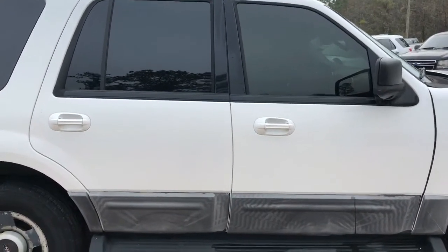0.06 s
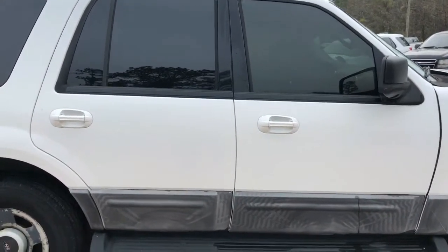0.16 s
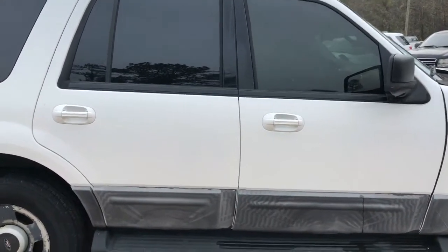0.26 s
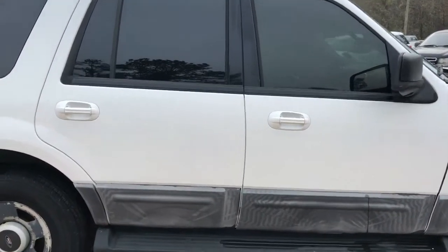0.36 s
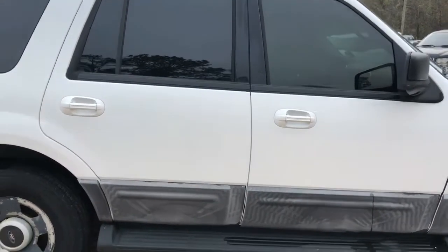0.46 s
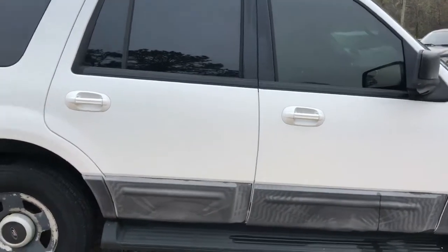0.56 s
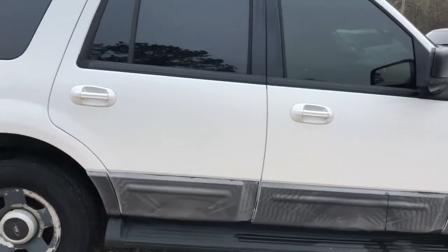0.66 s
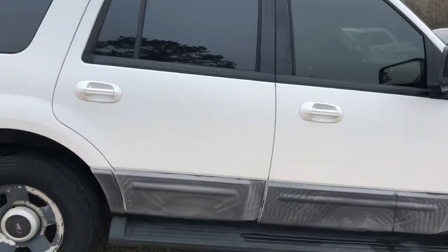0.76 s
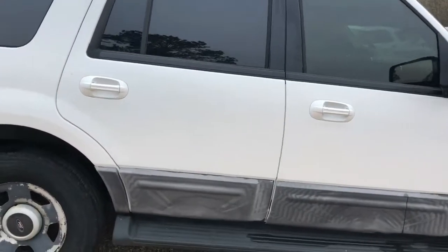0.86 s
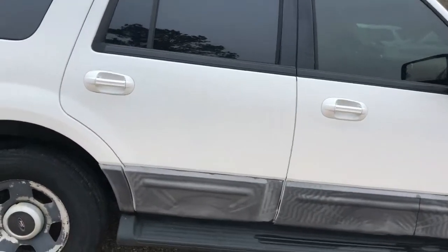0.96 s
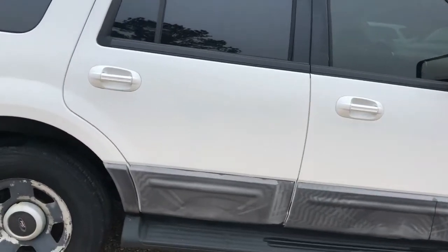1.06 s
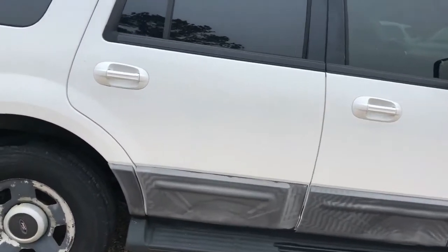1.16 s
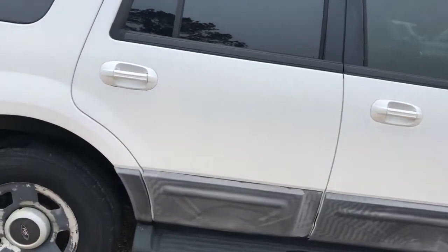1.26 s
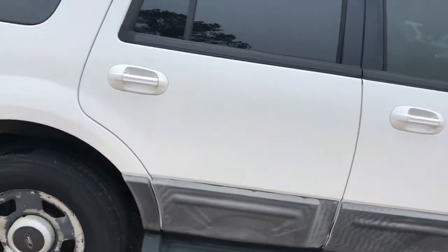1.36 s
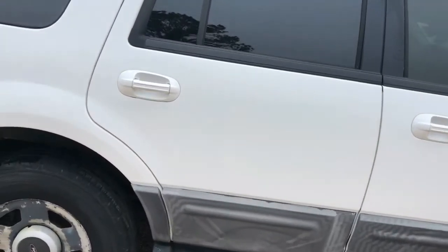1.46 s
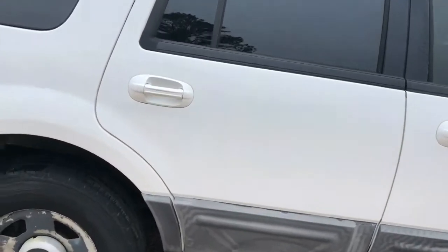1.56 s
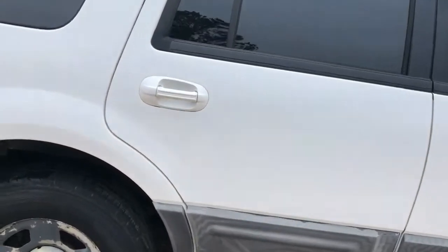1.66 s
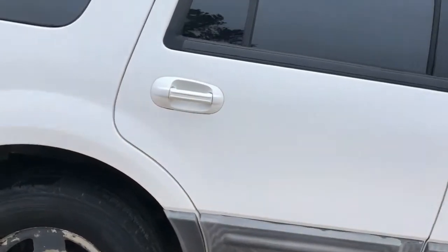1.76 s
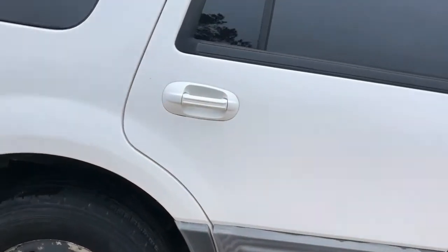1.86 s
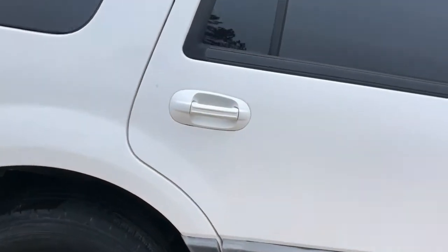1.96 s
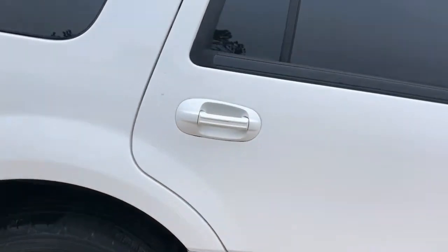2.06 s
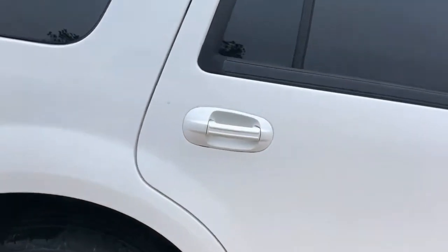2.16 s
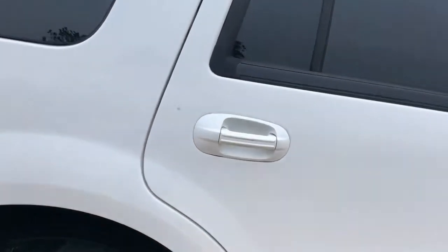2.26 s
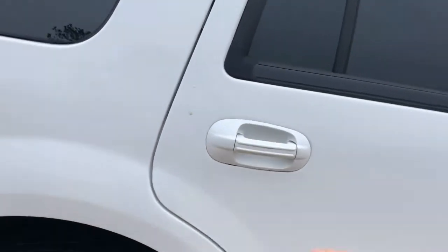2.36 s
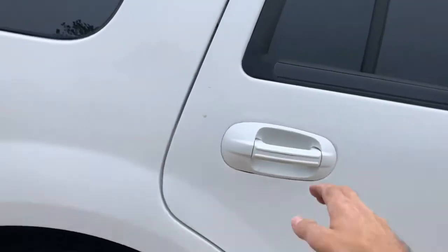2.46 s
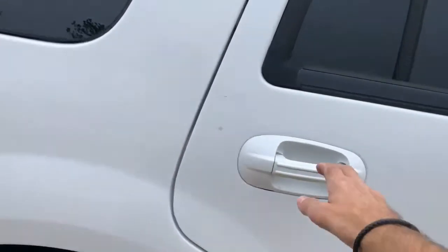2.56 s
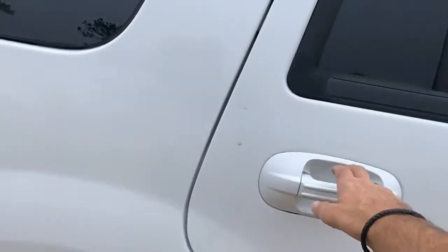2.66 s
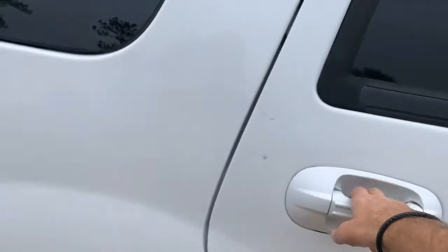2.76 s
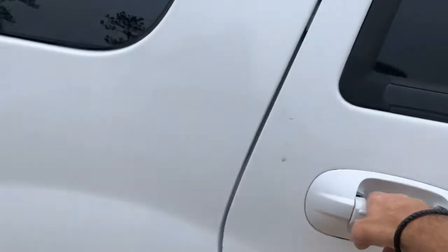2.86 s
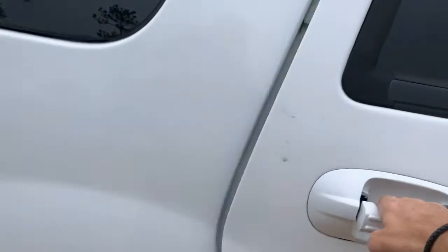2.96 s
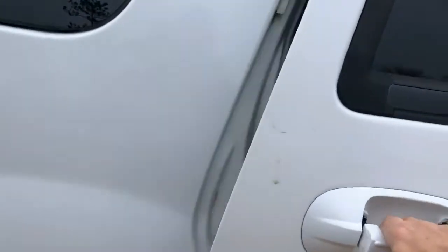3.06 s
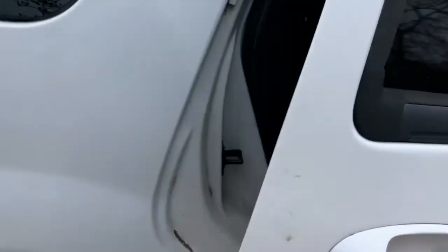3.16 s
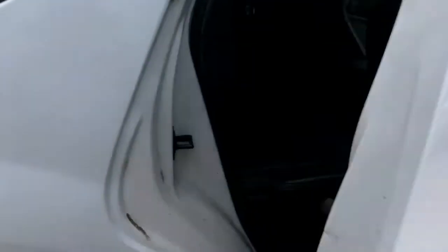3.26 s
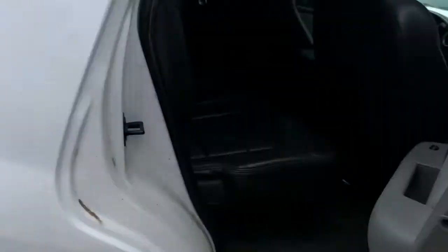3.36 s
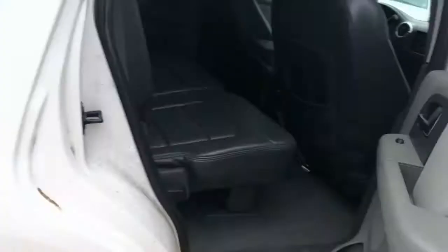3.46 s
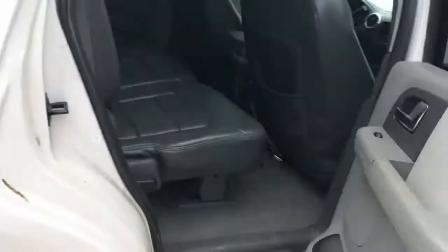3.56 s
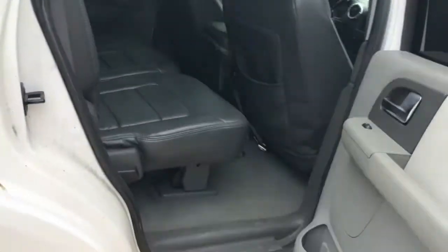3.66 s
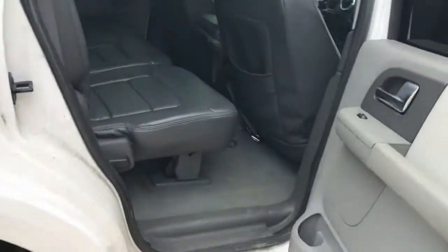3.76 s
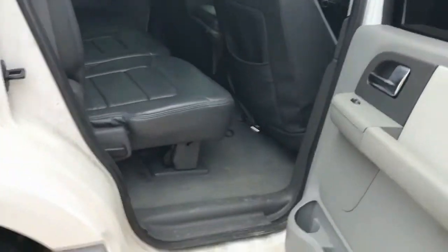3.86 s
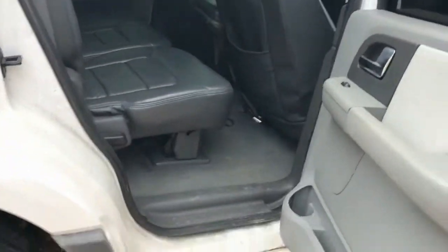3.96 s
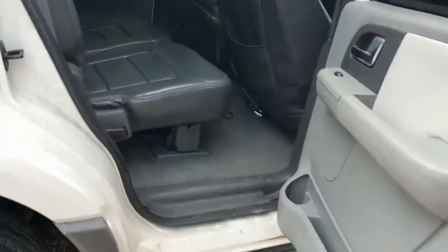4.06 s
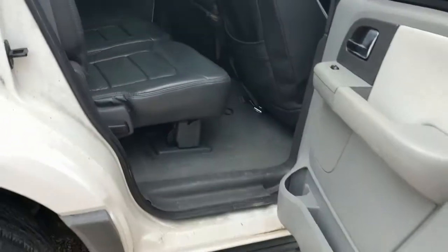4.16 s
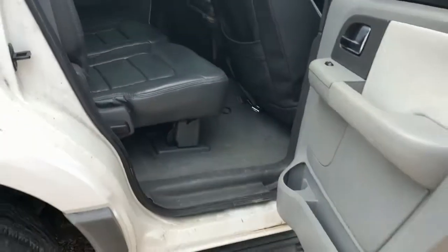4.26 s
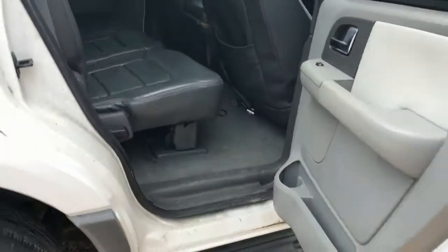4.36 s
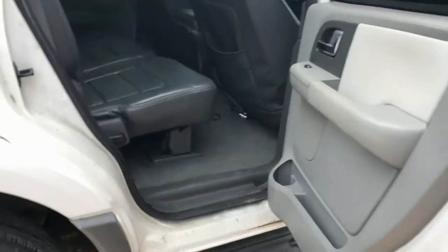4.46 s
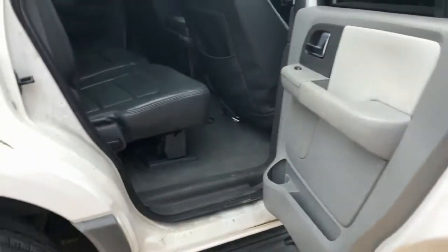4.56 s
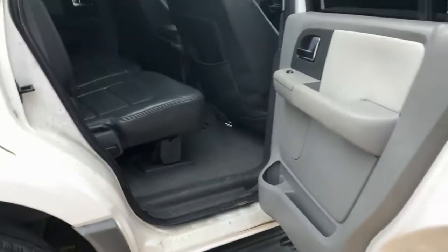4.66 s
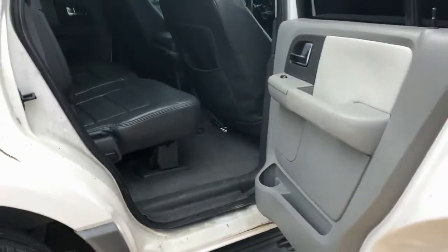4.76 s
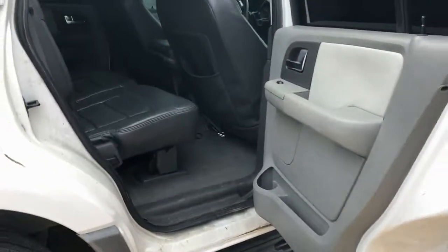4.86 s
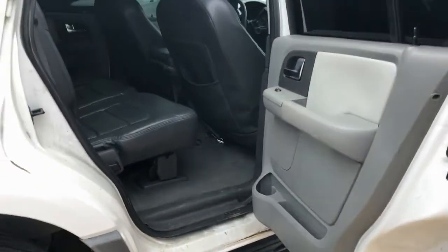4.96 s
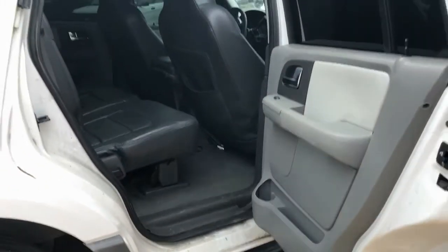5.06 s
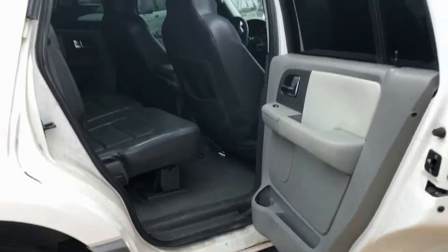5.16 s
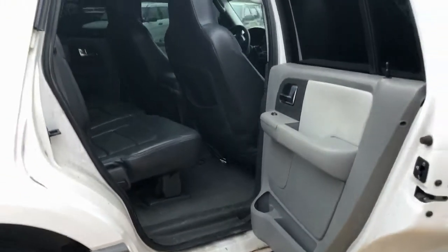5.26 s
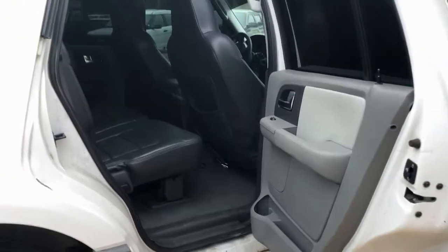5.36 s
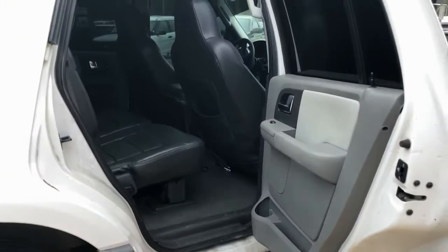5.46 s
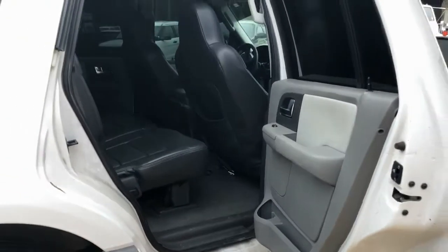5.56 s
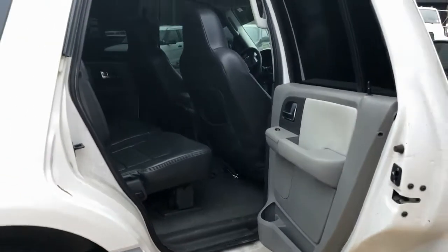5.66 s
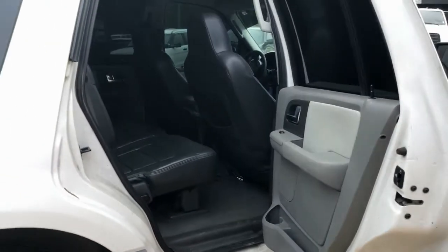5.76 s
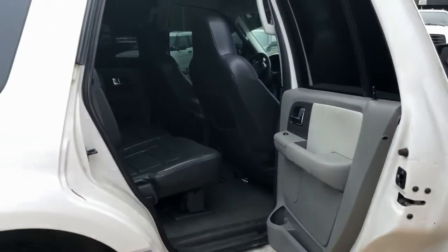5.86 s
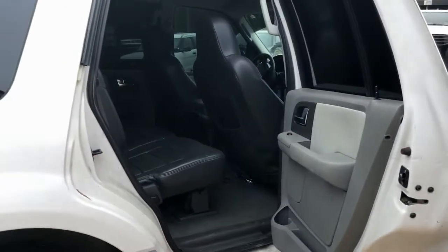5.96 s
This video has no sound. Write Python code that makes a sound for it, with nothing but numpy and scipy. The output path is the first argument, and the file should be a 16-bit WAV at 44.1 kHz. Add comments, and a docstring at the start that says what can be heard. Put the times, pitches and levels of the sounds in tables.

```python
"""Distant traffic hums throughout as someone walks over a gravel lot to a parked car: stones tick as they
collide, grit crunches under sliding shoes and heels thud. Near 2.9 s the rear door handle is pulled: the
seal starts to peel, and handle and latch parts snap and thump the door shell into its bending modes,
hardest near 3.4 s. The door swings open, shuddering, and from 4.1 s its hinge creaks by stick-slip
friction while the gravel goes on shifting underfoot."""
import sys
import numpy as np
from scipy import signal
from scipy.io import wavfile
from scipy.ndimage import uniform_filter1d

SR = 44100
rng = np.random.default_rng(int(sys.argv[2]) if len(sys.argv) > 2 else 0)


def store_pcm(level_fs):
    """Save levels as 16-bit WAV."""
    pcm = np.round(np.clip(level_fs, -1, 1) * 32767).astype(np.int16)
    wavfile.write(sys.argv[1], SR, np.atleast_2d(pcm).T)


N = 265041


def undb(db):
    """Decibels to amplitude ratio."""
    return 10 ** (np.asarray(db) / 20)


def level(x, db):
    """Scale to an RMS level."""
    return x * undb(db) / np.sqrt(np.mean(x ** 2))


def band(x, hz, width_hz):
    """Second-order resonance with gain 1 at its centre."""
    return signal.lfilter(*signal.iirpeak(min(hz, .45 * SR), hz / width_hz, fs=SR), x)


def fade(t60_s, size):
    """Exponential decay of a damped vibration: 60 dB in t60_s."""
    return np.exp(-np.log(1000) * np.arange(size) / SR / max(t60_s, .004))


def add(out, start_s, x):
    """Superpose x on out from start_s."""
    i = int(start_s * SR)
    out[i:i + len(x)] += x[:N - i]


def drift(rate_hz):
    """Slow random modulation: values held for 1 / rate_hz seconds and smoothed twice."""
    hold = int(SR / rate_hz)
    steps = np.repeat(rng.standard_normal(N // hold + 1), hold)
    return uniform_filter1d(uniform_filter1d(steps, hold), hold)[:N]


def grains(per_s, spread_db, t60_s):
    """Poisson process of sharp, decaying noise bursts, a few much bigger than the rest."""
    hits = rng.random(N) < per_s / SR
    strengths = hits * undb(spread_db * rng.exponential(size=N))
    envelope = signal.fftconvolve(strengths, fade(t60_s, 1024))[:N]
    return envelope * rng.standard_normal(N)


# Relative spectrum of distant traffic: frequency_hz, density_db
TRAFFIC_SPECTRUM = [(15, -40), (25, -6), (92, 1), (153, -6), (217, -2), (373, -11), (439, -8.5),
                    (516, -8.5), (695, -6), (1160, -13.5), (2110, -29.5), (5280, -36), (6380, -40.5),
                    (7110, -41), (16000, -48.5)]
def traffic():
    """Amplitude-modulated noise: third-octave bands swell together and flicker independently."""
    frequency_hz, density_db = np.transpose(TRAFFIC_SPECTRUM)
    out, swell_db = np.zeros(N), 0.4 * drift(0.485)
    for hz in 25 * 2 ** (np.arange(29) / 3):
        steady_db = np.interp(np.log(hz), np.log(frequency_hz), density_db)
        flicker_db = 3.2 * drift(23)
        noise = band(band(rng.standard_normal(N), hz, hz / 3), hz, hz / 3)
        out += undb(steady_db + swell_db + flicker_db) * noise
    return level(out, -57.5)


# Collisions of single stones and small parts; crack and edge are relative to the body's peak:
# start_s, peak_db, pitch_hz, crack_db, crack_hz, t60_s, edge_db
STONE_IMPACTS = [(0.175, -52, 1130, 0, 4540, 0.018, -12), (0.2434, -51, 902, -12, 5070, 0.018, -26),
                 (0.3292, -47, 937, -13, 3600, 0.018, -30), (0.3554, -55, 1510, -13, 3570, 0.018, -22),
                 (0.4226, -44, 1040, -4, 5200, 0.016, -21), (0.4379, -37.5, 1250, -21, 3030, 0.02, -33),
                 (0.4963, -44, 1120, -1, 5160, 0.018, -15), (0.5272, -32, 1360, -8, 4800, 0.018, -24),
                 (0.5606, -36.5, 1450, -23, 3280, 0.018, -33), (0.5721, -37.5, 1440, -27, 3280, 0.02, -32),
                 (0.6255, -38, 2840, 0, 3000, 0.018, -10), (0.6354, -36, 2480, -1, 3400, 0.018, -15),
                 (0.7931, -44, 1120, -16, 3540, 0.018, -26), (0.8414, -54, 930, 0, 5170, 0.018, -11),
                 (1.0156, -38, 930, -15, 3160, 0.018, -25), (1.061, -45.5, 953, -14, 5030, 0.018, -23),
                 (1.1144, -40, 1660, -4, 7420, 0.018, -14), (1.1209, -44, 1130, -9, 7280, 0.018, -13),
                 (1.1623, -34, 1260, 2.5, 5650, 0.018, -10), (1.1707, -39, 1170, -1, 5510, 0.018, -13),
                 (1.2264, -41, 1250, -11, 4810, 0.018, -21), (1.2424, -48, 1260, -14, 3140, 0.018, -27),
                 (1.4192, -33.5, 1370, -24, 3030, 0.022, -30), (1.6097, -47, 1150, -4, 3670, 0.02, -18),
                 (1.6477, -55, 929, -7, 3450, 0.018, -17), (1.6761, -43.5, 1540, -11, 3130, 0.02, -25),
                 (1.7504, -36, 4400, -3, 4760, 0.018, -9), (1.7554, -29, 1750, -2, 6090, 0.018, -8),
                 (1.7784, -35, 895, -10, 5200, 0.017, -15), (1.7888, -39.5, 1090, -17, 5150, 0.018, -24),
                 (1.8238, -31.5, 950, -8, 3060, 0.021, -12), (1.8437, -24.5, 835, -9, 2980, 0.021, -14),
                 (1.8504, -41, 1270, 13.5, 8920, 0.018, -5), (1.8984, -49.5, 1050, -5, 4890, 0.018, -9),
                 (1.9674, -49, 1480, -4, 3870, 0.018, -22), (2.3565, -42, 1240, -14, 3160, 0.018, -27),
                 (2.4019, -51, 1030, 6, 3400, 0.018, -14), (2.4174, -45, 1190, -2, 5420, 0.018, -18),
                 (2.4324, -36, 1250, -15, 3330, 0.02, -19), (2.4658, -38, 1250, -14, 7140, 0.018, -17),
                 (2.4917, -40, 1260, -12, 7280, 0.018, -15), (2.5082, -35, 1210, -21, 7330, 0.018, -26),
                 (2.5316, -34, 1100, -18, 3410, 0.018, -25), (2.5576, -33, 1130, -20, 3320, 0.018, -26),
                 (2.6259, -50, 1330, -15, 5000, 0.018, -25), (2.6564, -39, 1033, -22, 3140, 0.018, -32),
                 (2.7147, -45, 1280, -10, 3040, 0.018, -25), (2.7526, -36, 902, -26, 3360, 0.018, -36),
                 (2.7726, -37, 920, -24, 5120, 0.018, -29), (2.833, -38, 970, -22, 7240, 0.018, -29),
                 (3.0869, -33.5, 940, -16, 3520, 0.02, -20), (3.1148, -42, 1370, -13, 3500, 0.018, -19),
                 (3.1414, -46, 1460, -8, 3460, 0.018, -20), (3.2204, -49, 1100, -1, 3470, 0.018, -11),
                 (3.253, -38.5, 1170, -16, 3200, 0.022, -26), (3.2854, -41, 1140, -11, 5140, 0.018, -19),
                 (3.4254, -41, 996, -10, 3800, 0.018, -16), (3.5554, -43.5, 902, 8.5, 7170, 0.018, -3),
                 (3.6321, -32.5, 1270, -7, 5380, 0.021, -15), (3.6414, -45, 1310, 7, 3430, 0.016, -5),
                 (3.8706, -57, 1450, -16, 3550, 0.018, -25), (3.9838, -52, 1130, -9, 3010, 0.018, -22),
                 (4.0228, -43, 1140, -3, 3490, 0.018, -7), (4.0452, -38.5, 880, 10, 7560, 0.023, 2),
                 (4.0604, -42, 915, 4, 5390, 0.018, -9), (4.0816, -52.5, 1040, 14, 5640, 0.02, -4),
                 (4.1515, -45, 902, -11, 3310, 0.02, -20), (4.2184, -66, 1010, 1, 7320, 0.018, -4),
                 (4.4079, -46.5, 2130, -3, 6840, 0.021, -8), (4.4308, -57, 3000, 16, 4770, 0.018, -7),
                 (4.4964, -41.5, 3140, -5, 3000, 0.021, -16), (4.6663, -48, 2970, -11, 3550, 0.02, -24),
                 (4.8688, -38, 1490, -11, 3280, 0.018, -23), (4.8933, -46, 1480, -15, 4180, 0.018, -26),
                 (5.0384, -56, 1035, -7, 4870, 0.018, -25), (5.1976, -44, 1000, -10, 5580, 0.018, -19),
                 (5.2375, -39, 1570, -20, 3010, 0.018, -28), (5.3694, -58, 1034, -7, 3350, 0.018, -22),
                 (5.3994, -48.5, 1530, -14, 3080, 0.018, -31), (5.5383, -46, 1150, -11, 3000, 0.018, -23),
                 (5.6545, -46, 1190, -21, 5070, 0.018, -29)]
def stone_ticks():
    """Damped resonance: each struck stone rings briefly under a brighter crack; faint grit ticks on."""
    out, size = np.zeros(N), 2048
    for start_s, peak_db, pitch_hz, crack_db, crack_hz, t60_s, edge_db in STONE_IMPACTS:
        contact = rng.standard_normal(size)
        contact[:2] += 4  # the first contact is the hardest
        body = band(contact * fade(t60_s, size), pitch_hz, 0.44 * pitch_hz)
        body = band(body, pitch_hz, 1.9 * pitch_hz)
        crack = band(contact * fade(1.03 * t60_s, size), crack_hz, 1.5 * crack_hz)
        crack = band(crack, crack_hz, 2.6 * crack_hz)
        edge = band(band(contact * fade(.7 * t60_s, size), 11000, 7000), 11500, 9000)
        for part, relative_db in (body, 0), (crack, crack_db), (edge, edge_db):
            add(out, start_s, undb(peak_db + relative_db) * part / np.abs(part).max())
    grit = grains(per_s=40, spread_db=1.8, t60_s=0.014)
    return out + level(band(band(grit, 3700, 5100), 3500, 9000), -80.5)


# Gravel and grit sliding under a shoe or hand; treble and crunch are relative to the scuff's gain:
# start_s, length_s, rise_fraction, gain_db, hiss_hz, treble_db, crunch_db
SCUFFS = [(0.318, 0.044, 0.17, -71, 2700, -14, 14), (0.421, 0.14, 0.82, -60, 4600, -16, 2),
          (0.568, 0.045, 0.7, -79.5, 2200, -12, 24), (0.624, 0.067, 0, -72.5, 3100, -2, 17.5),
          (0.79, 0.088, 0.14, -73, 3800, -9, 1), (0.91, 0.077, 0.27, -73, 3500, -6, 10),
          (1.009, 0.098, 0.05, -65.5, 2830, -8, 5.5), (1.103, 0.11, 0.17, -60.5, 3700, 3.5, 10),
          (1.175, 0.13, 0.3, -64, 3000, -6, 11.5), (1.594, 0.3, 0.05, -68.5, 3100, -6, 0),
          (1.746, 0.028, 0.17, -45.5, 5100, 1.5, 4), (1.78, 0.088, 0, -57.5, 2700, -2.5, 10.5),
          (1.841, 0.098, 0.69, -57.5, 3830, -8, 1.5), (1.93, 0.085, 0.3, -65.5, 4000, -21, 0),
          (2.35, 0.028, 0.38, -60.5, 2900, -15, 4), (2.402, 0.054, 0, -55.5, 2920, -6.5, 5.5),
          (2.459, 0.058, 0.24, -63.5, 2900, 4.5, 16), (2.525, 0.058, 0.19, -62, 2930, -2, 10),
          (2.565, 0.41, 0.02, -75, 2700, -0.5, 9.5), (3.082, 0.11, 0.08, -61.5, 2900, -5, 2),
          (3.19, 0.11, 0.28, -70.5, 3100, -3, 6), (3.283, 0.16, 0.25, -59, 3220, -6, 6.5),
          (3.4, 0.17, 0.12, -60.5, 2500, -11, 7.5), (3.534, 0.21, 0.33, -65.5, 2900, -4.5, 3.5),
          (3.747, 0.16, 0.05, -67, 3680, 2, 9.5), (3.841, 0.15, 0.57, -62, 3200, -11, 3),
          (3.979, 0.097, 0, -60, 3350, -15, 3.5), (4.048, 0.021, 0.4, -60, 6900, -1, 3),
          (4.074, 0.035, 0.5, -68, 5200, -2, -15), (4.162, 0.036, 0.2, -61, 3660, -12, -23),
          (4.415, 0.06, 0.17, -60, 5430, 1, -6), (4.464, 0.06, 0.43, -58.5, 4000, -2.5, -3),
          (4.523, 0.14, 0.31, -64.5, 3340, -8, 3), (4.66, 0.046, 0.3, -69.5, 3200, -10, 8),
          (4.701, 0.055, 0.6, -57, 3600, -4, 3.5), (4.765, 0.075, 0, -71.5, 4100, -6, 7.5),
          (4.854, 0.049, 0.24, -61.5, 3000, -8.5, 6), (4.992, 0.07, 0.64, -70, 4300, -18, 4),
          (5.148, 0.074, 0.61, -55.5, 4700, -9, 6.5), (5.209, 0.092, 0.18, -70, 2300, -4, 12),
          (5.349, 0.083, 0.05, -70, 3126, -18, 9.5), (5.474, 0.11, 0.47, -71.5, 2900, -11, 9.5),
          (5.643, 0.03, 0.43, -76, 2400, -13, -4.5)]
def gravel_scuffs():
    """Granular friction: many tiny impacts merge, fine grit into a hiss, coarse stones into a crunch."""
    fine = level(grains(per_s=1800, spread_db=1.1, t60_s=0.013), 0)
    coarse = grains(per_s=500, spread_db=2.0, t60_s=.012)
    treble = level(band(band(fine, 7300, 8000), 6700, 15700), 0)
    crunch = level(band(band(coarse, 670, 1540), 810, 1440), 0)
    out = np.zeros(N)
    for start_s, length_s, rise, gain_db, hiss_hz, treble_db, crunch_db in SCUFFS:
        progress = np.arange(int(1.5 * length_s * SR)) / SR / length_s
        rise = np.clip(rise, .02, .95)
        release = np.exp(-1.5 * ((progress - rise) / (1 - rise)) ** 2)
        envelope = np.where(progress < rise, progress / rise, release)
        first = int(start_s * SR)
        span = slice(first, first + len(progress))
        hiss = undb(4.5) * band(band(fine[span], hiss_hz, .8 * hiss_hz), hiss_hz, 2.7 * hiss_hz)
        scuff = hiss + undb(treble_db) * treble[span] + undb(crunch_db) * crunch[span]
        add(out, start_s, undb(gain_db + 2.0) * envelope * scuff)
    return out


# Heels on the ground and the door's weight on its hinge: start_s, peak_db, pitch_hz, t60_s
THUDS = [(0.5, -45.5, 65, 0.11), (1.434, -39.5, 162, 0.19), (1.449, -35.5, 80, 0.2),
         (1.47, -47, 94.2, 0.15), (1.847, -39, 234, 0.086), (2.05, -49.5, 129, 0.11),
         (2.48, -44, 187, 0.24), (3.499, -32.5, 159, 0.12), (4.088, -51, 59.2, 0.13),
         (4.439, -44.5, 84, 0.12)]
def thuds():
    """Transient response: a noise burst drives a low resonance, which swells over milliseconds and dies."""
    out, size = np.zeros(N), 8192
    for start_s, peak_db, pitch_hz, t60_s in THUDS:
        burst = rng.standard_normal(size) * fade(t60_s, size)
        thud = band(band(burst, pitch_hz, 0.41 * pitch_hz), pitch_hz, 2.1 * pitch_hz)
        add(out, start_s, undb(peak_db) * thud / np.abs(thud).max())
    return out


# Bending modes of the door shell: pitch_hz, gain_db, t60_s
SHELL_MODES = [(74, -10, 0.34), (124, -2, 0.13), (173, -6.5, 0.18), (266.4, -13.5, 0.14),
               (347.3, -1, 0.088), (425.2, 2.5, 0.084), (513, 0.5, 0.058), (651, 2.5, 0.044),
               (706, -0.5, 0.082), (868, 0, 0.034), (1008, -1.5, 0.043), (1098, 1.5, 0.027),
               (1205, 3.5, 0.028), (1343, 2, 0.036), (1475, -7.5, 0.061), (1610, -11.5, 0.11),
               (1604, -9, 0.057), (2360, -9, .06), (2480, -28, 0.094), (3030, -11, .05)]
RING_SAMPLES = SR // 3
def shell_ring(mode_gains, lag_ms):
    """Dispersion: bending waves are slow in the bass, so low modes arrive late (by lag_ms at 120 Hz)."""
    out, t = np.zeros(RING_SAMPLES), np.arange(RING_SAMPLES) / SR
    for gain, (pitch_hz, gain_db, t60_s) in zip(mode_gains, SHELL_MODES):
        lag_s = lag_ms / 1000 * (120 / pitch_hz) ** 1.5
        arrival = np.sin(np.pi / 2 * np.clip(t / (1.3 * lag_s), 0, 1)) ** 3
        mode = np.sin(2 * np.pi * pitch_hz * (t - lag_s))
        out += gain * undb(gain_db) * mode * arrival * fade(t60_s, RING_SAMPLES)
    return out


# Envelope of the peeling seal and the swinging door's shudder: time_s, level_db
SEAL_ENVELOPE = [(2.89, -67), (2.91, -31.5), (2.95, -43.5), (3.0, -30.5), (3.05, -44.5), (3.14, -57.5),
                 (3.24, -68), (3.3, -44), (3.36, -46), (3.42, -35.5), (3.48, -47), (3.55, -41.5),
                 (3.58, -48.5), (3.64, -47.5), (3.73, -61), (3.8, -40), (3.86, -45.5), (3.95, -83),
                 (4.0, -46.5), (4.05, -58), (4.1, -70), (4.14, -82)]
def seal_peel():
    """Forced vibration: the peeling seal shakes the damped shell with a dense train of small pulses."""
    damped_ring = shell_ring(np.ones(len(SHELL_MODES)), lag_ms=2.7) * fade(0.045, RING_SAMPLES)
    peeling = grains(per_s=2000, spread_db=1.0, t60_s=0.013)
    shudder = band(signal.fftconvolve(peeling, damped_ring)[:N], 130, 400)
    time_s, level_db = np.transpose(SEAL_ENVELOPE)
    envelope_db = np.interp(np.arange(N) / SR, time_s, level_db, left=-120, right=-120)
    return undb(envelope_db) * level(shudder, 0)


# Blows of handle, latch and check strap: start_s, shell_db, contact_ms, lag_ms, snap_db, rattle_t60_s
DOOR_BLOWS = [(2.894, -45, 0.34, 4.4, -56, 0.039), (2.902, -43, 0.5, 4.6, -44, .015),
              (2.905, -34, .6, 3.9, -50, 0.061), (2.91, -34.5, 0.18, 5.5, -53, .03),
              (2.922, -30, 0.39, 5.5, -35, 0.091), (2.956, -18, 0.51, 6, -20.5, 0.043),
              (2.964, -27.5, 1.08, 5.5, -36.5, 0.072), (2.983, -34, 0.55, 4.1, -51, 0.099),
              (3.010, -35, .8, 5.5, -50, 0.069), (3.036, -47, 0.21, 5.2, -29.5, 0.056),
              (3.346, -40, .2, 5.3, -25, 0.051), (3.356, -30, 0.45, 4.1, -25, 0.03),
              (3.368, -13, .45, 14, -34, 0.038), (3.376, -26, 0.17, 14.7, -45, .05),
              (3.392, -27, 0.58, 8.4, -51, .05), (3.445, -34.5, 1.1, 7.8, -58, .05),
              (3.512, -53, 0.25, 5, -35, 0.027), (3.527, -36.5, 0.53, 4.9, -46, 0.037),
              (3.763, -46, 0.39, 5, -41, 0.068), (3.790, -38.5, 1, 4.7, -47.5, 0.037),
              (3.824, -48, 0.29, 4.6, -51, .05), (3.969, -47, 0.75, 4.8, -60, .05),
              (4.005, -51, 0.48, 5.9, -56, .05), (4.058, -49, 0.65, 4.7, -60, .03)]
def shell_blows():
    """Impact excitation: a force pulse rings the shell; the longer the contact, the duller the thump."""
    out = np.zeros(N)
    # countless small modes of trim and glass build up just after the blow
    trim_envelope = fade(.13, RING_SAMPLES) - fade(.02, RING_SAMPLES)
    for start_s, shell_db, contact_ms, lag_ms, _, _ in DOOR_BLOWS:
        force = np.hanning(int(contact_ms * SR / 500) + 3)  # about contact_ms wide at half height
        # every blow lands elsewhere on the mode shapes
        mode_gains = undb(2.5 * rng.standard_normal(len(SHELL_MODES)))
        trim = undb(9) * band(rng.standard_normal(RING_SAMPLES), 450, 800) * trim_envelope
        ring = signal.fftconvolve(shell_ring(mode_gains, lag_ms) + trim, force / force.sum())
        onset_rms = np.sqrt(np.mean(ring[:512] ** 2))
        add(out, start_s, undb(shell_db) * ring / onset_rms)
    return out


# Resonances of the metal handle and latch parts: pitch_hz, width_hz, gain_db
LATCH_MODES = [(1170, 710, 3.5), (2380, 620, 2), (3034, 586, -11), (5100, 1260, -12), (7095, 230, -12.5),
               (9120, 860, -23)]
def latch_snaps():
    """Source and filter: each blow starts a decaying rattle, coloured by the metal parts' resonances."""
    rattle = np.zeros(N)
    for start_s, _, _, _, snap_db, rattle_t60_s in DOOR_BLOWS:
        burst = rng.standard_normal(RING_SAMPLES) * fade(rattle_t60_s, RING_SAMPLES)
        add(rattle, start_s, undb(snap_db) * burst)
    metal = sum(undb(gain_db) * band(rattle, hz, width_hz) for hz, width_hz, gain_db in LATCH_MODES)
    return undb(7) * band(metal, 3500, 8000)


# Creaks of the hinge as the door settles: start_s, level_db, pitch_hz, length_s
CREAKS = [(4.139, -46, 550, 0.027), (4.292, -54, 500, 0.024), (4.401, -48.5, 643, 0.012),
          (4.645, -46, 530, 0.011), (5.085, -49, 572, 0.017)]
def hinge_creaks():
    """Stick-slip friction: short, rough chirps that sag in pitch."""
    out = np.zeros(N)
    for start_s, level_db, pitch_hz, length_s in CREAKS:
        t = np.arange(int(length_s * SR)) / SR
        chirp = np.sin(2 * np.pi * pitch_hz * t * (1 - 0.062 * t / length_s))
        roughness = 2.6 * band(rng.standard_normal(len(t)), pitch_hz, 170)
        add(out, start_s, undb(level_db) * (chirp + roughness) * np.sin(np.pi * t / length_s))
    return out


def scene():
    """Superposition: the near sources, their reflections and the distant traffic add in one channel."""
    footsteps_and_thuds = stone_ticks() + gravel_scuffs() + thuds()
    # a panel the size of a door radiates its lowest motion poorly
    radiation = signal.butter(2, 90, "high", fs=SR, output="sos")
    panel = signal.sosfilt(radiation, seal_peel() + shell_blows())
    near = footsteps_and_thuds + panel + latch_snaps() + hinge_creaks()
    # ground and neighbouring cars scatter a short, dull tail
    tail = band(rng.standard_normal(SR // 2), 1740, 2300) * fade(t60_s=0.13, size=SR // 2)
    reflections = signal.fftconvolve(near, tail / np.linalg.norm(tail))[:N]
    return (near + undb(-17.5) * reflections + traffic())[None]


# Peaks and a dip of the microphone's sound port: centre_hz, width_hz, gain_db
PORT_RESPONSE = [(2000, 290, -2), (3190, 530, 4), (5170, 820, 5.5), (7390, 670, 4.5), (9500, 400, 0.5)]
def record(dry):
    """Microphone response: the capsule hisses, the port colours the treble, both band ends are cut."""
    sound = dry + undb(-82) * rng.standard_normal(N)
    for centre_hz, width_hz, gain_db in PORT_RESPONSE:
        sound = sound + (undb(gain_db) - 1) * band(sound, centre_hz, width_hz)
    sound = signal.sosfilt(signal.butter(2, 40, "high", fs=SR, output="sos"), sound)
    return signal.sosfilt(signal.ellip(8, .3, 60, 15900, fs=SR, output="sos"), sound)


dry = scene()
out = record(dry)
store_pcm(out)
```